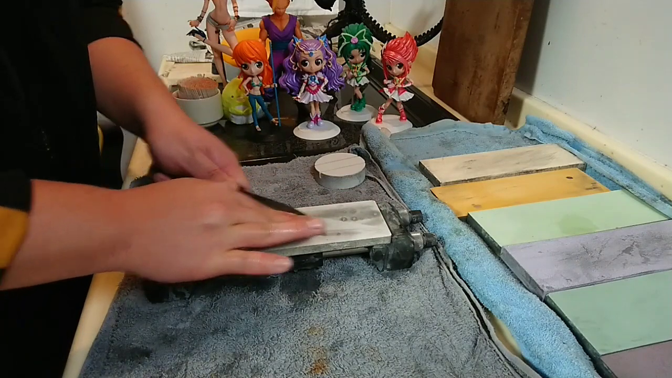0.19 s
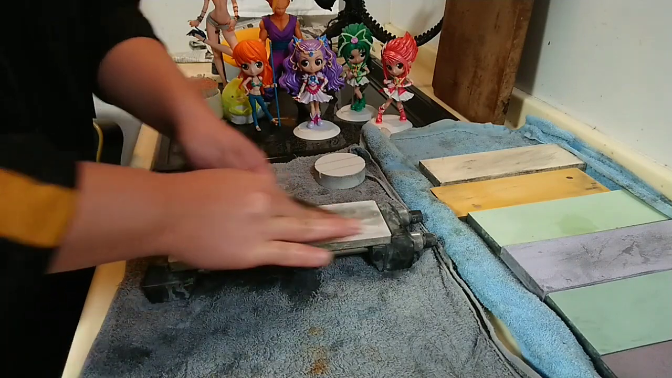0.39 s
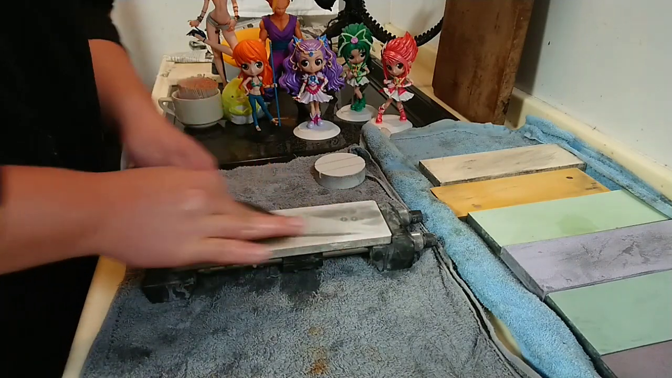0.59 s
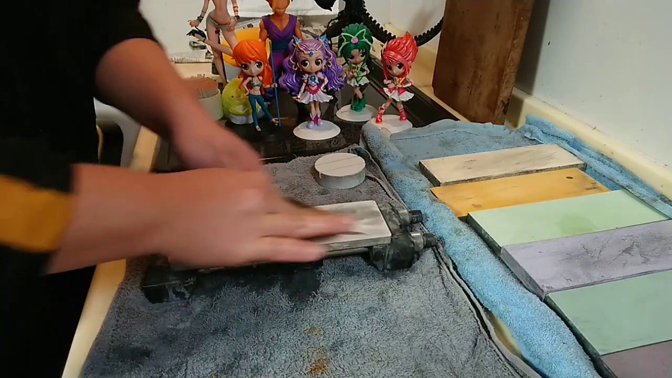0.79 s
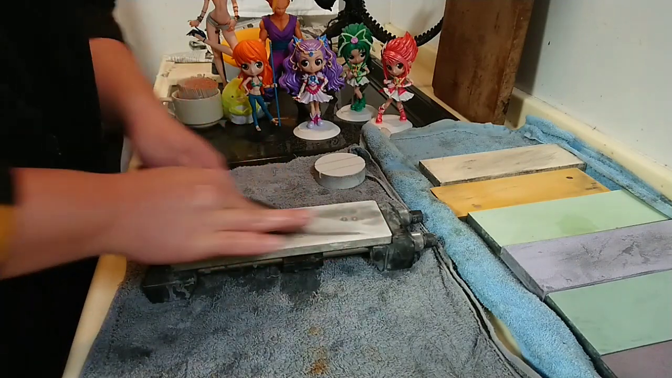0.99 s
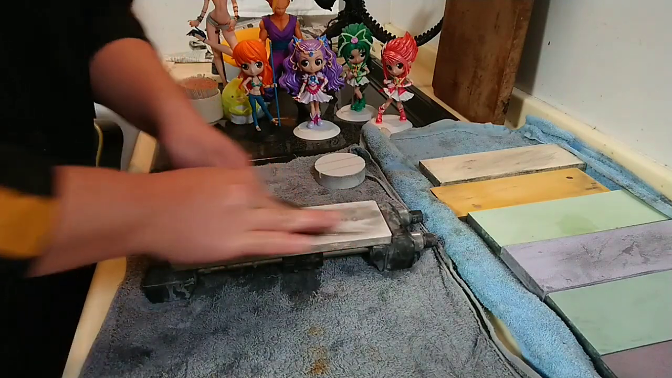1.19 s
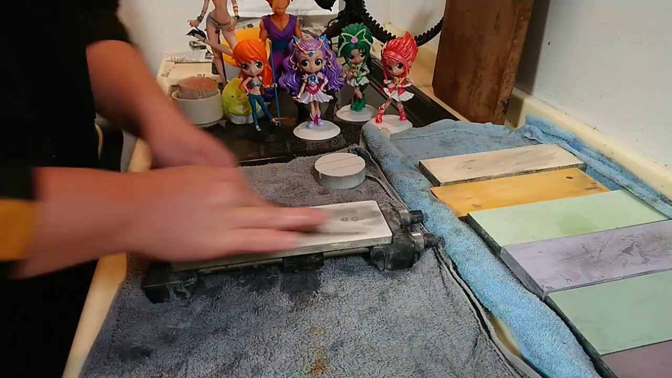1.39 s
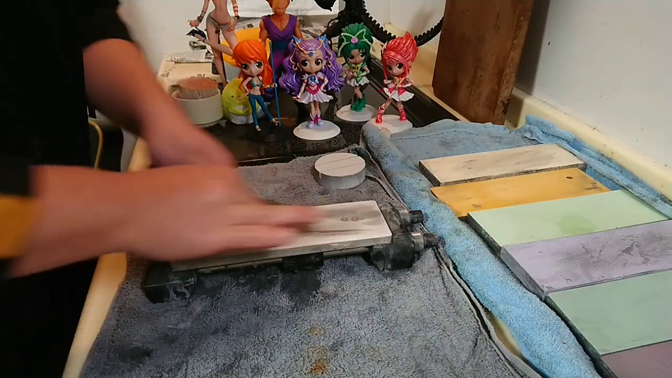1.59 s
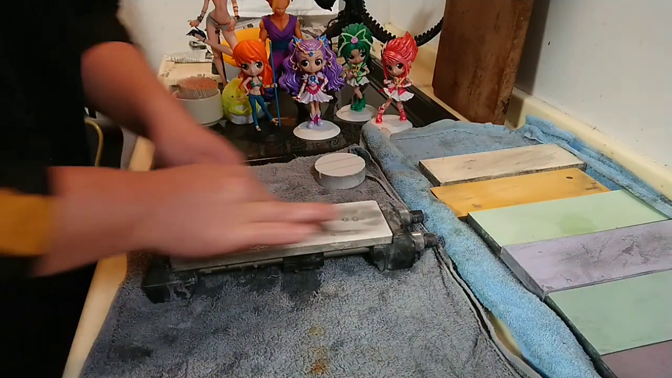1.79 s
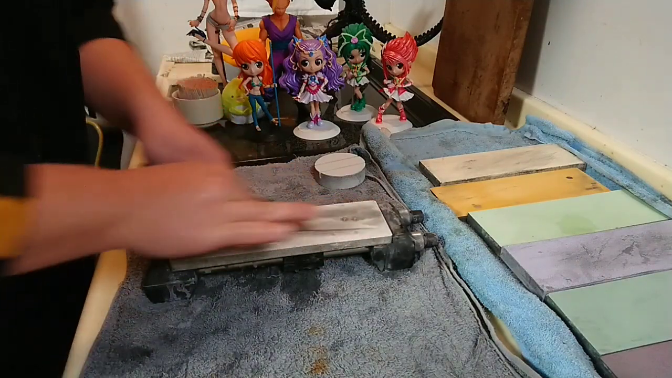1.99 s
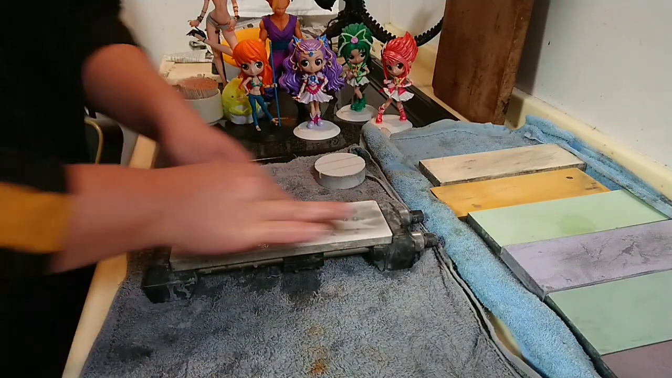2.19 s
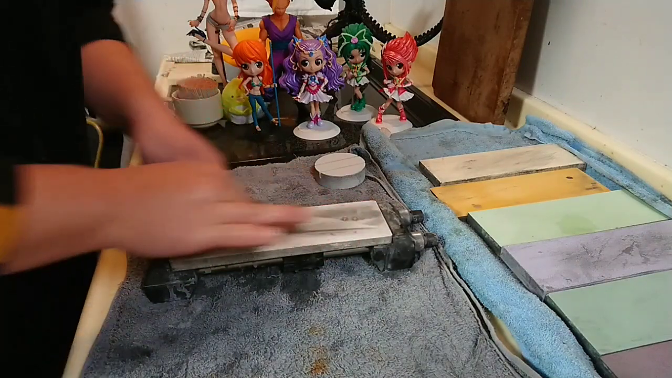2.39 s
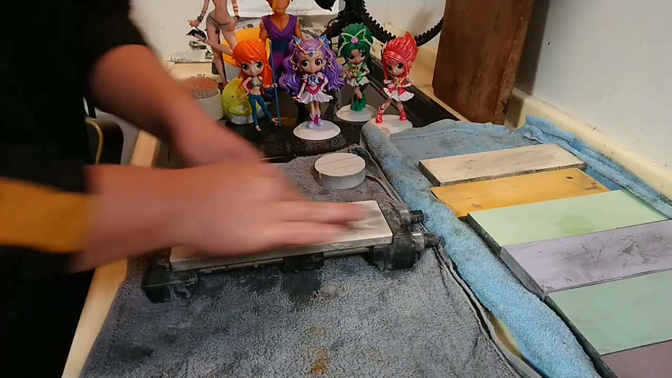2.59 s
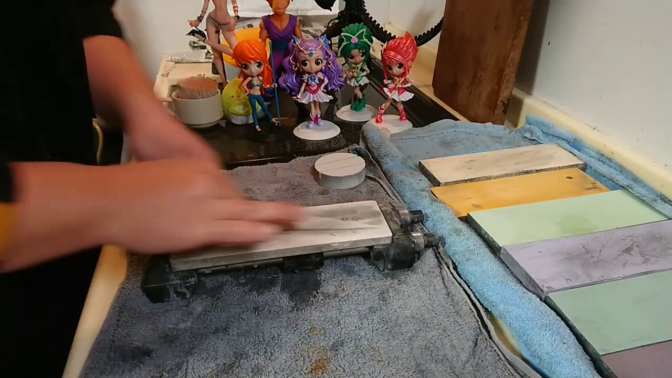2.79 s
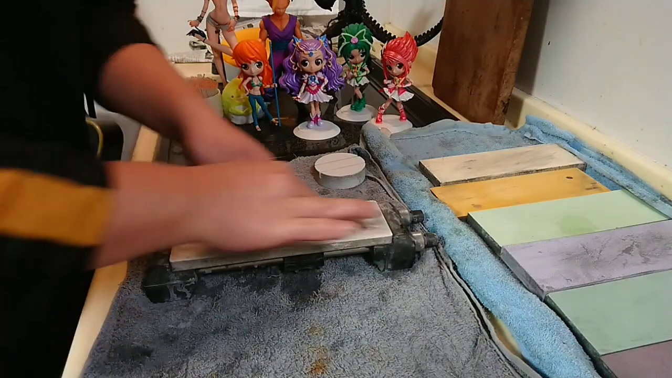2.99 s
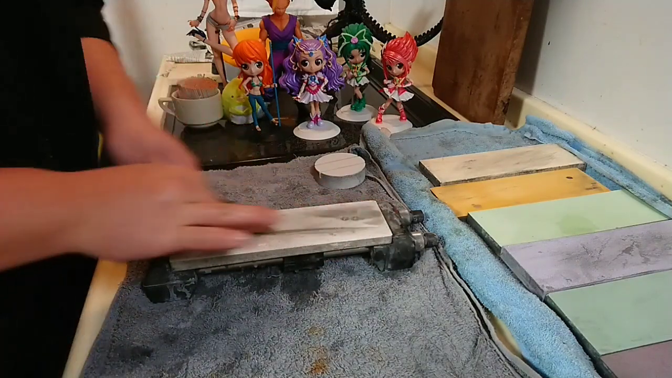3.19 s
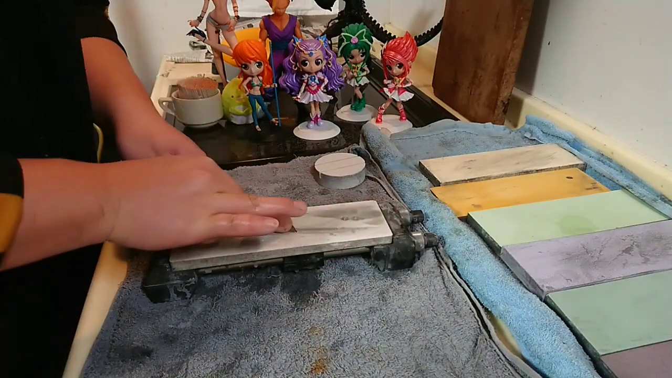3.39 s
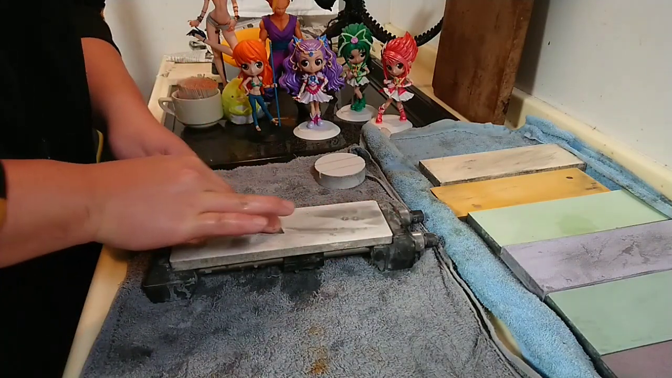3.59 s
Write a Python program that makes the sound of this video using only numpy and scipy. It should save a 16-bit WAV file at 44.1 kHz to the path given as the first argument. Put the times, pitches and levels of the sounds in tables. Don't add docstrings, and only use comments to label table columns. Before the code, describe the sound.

Knife blade scraping fast back and forth on a wet whetstone, gritty and hissing, close up

```python
import sys
import numpy as np
from scipy import signal
from scipy.fft import rfft, irfft, next_fast_len
from scipy.io import wavfile
from scipy.ndimage import uniform_filter1d

SR = 44100
rng = np.random.default_rng(int(sys.argv[2]) if len(sys.argv) > 2 else 0)


def master(y):
    cut = np.clip(np.atleast_2d(y).T, -1, 1)
    pcm = np.round(cut * 32767)
    wavfile.write(sys.argv[1], SR, pcm.astype(np.int16))


def natural_amplitude(level_db):
    exponent = np.asarray(level_db, float) / 20
    return 10 ** exponent


N = 160965

# f/Hz, level/dB
ROOM_HUSH = [(30, 4.5), (120, -4), (230, -21), (600, -19), (1400, -23), (2500, -32), (5000, -42),
             (16000, -48)]
# turn t/s, scrape level/dB, lean/dB (late minus early), table shake level/dB
STROKES = [(0.172, -26.5, -5, -50.5), (0.375, -25.5, -1.5, -45.5), (0.574, -23, -3.5, -45),
           (0.765, -28, -5, -44), (0.963, -24.5, 5.5, -45.5), (1.147, -26.5, -6.5, -45.5),
           (1.34, -24.5, 3.5, -44.5), (1.527, -27, -4.5, -44.5), (1.725, -23.5, 2, -44.5),
           (1.924, -27, -7, -42.5), (2.115, -24.5, 0, -43.5), (2.311, -26, 0.5, -46.5),
           (2.504, -23, -2.5, -45), (2.701, -27.5, -10, -43.5), (2.896, -24, 3.5, -45.5),
           (3.083, -25, -2, -45), (3.286, -31.5, -11, -49.5), (3.438, -41, -2, -52.5),
           (3.605, -29.5, 15, -51), (3.8, -26, 0, -60)]
# t/s, level/dB
COARSE_GRAINS = [
    (0.133, -68),
    (0.782, -33),
    (1.743, -34),
    (2.907, -39),
    (3.482, -39),
    (3.502, -37.5),
    (3.52, -49),
    (3.526, -42.5),
    (3.618, -51),
]
# f/Hz, width/Hz, level/dB, gain at the far end of the stone/dB, gain on the pull/dB
BLADE_MODES = [(741, 150, 11, 0, 0.5), (1461, 190, 5.5, -10.5, 4), (1640, 340, 1.5, -8.5, -4.5),
               (2170, 120, -9, -24.5, -4), (2720, 155, 4.5, 6, 0), (3220, 210, 6, -3.5, 1),
               (3790, 410, 6, 2, 3.5), (4580, 290, 3.5, -12, 4), (5080, 390, 6, 5.5, -2.5),
               (5700, 480, 5, 1.5, -1), (6020, 210, -2, -21, -2), (7056, 494, 7, -5, 0.5),
               (8870, 820, 3, -5, -0.5), (10330, 1730, -0.5, -8, 1)]
# f/Hz, level/dB
LEFT_PORT = [(300, -26.5), (560, -27), (1300, -11.5), (2400, -10), (4300, -2), (7500, -3.5), (12500, -3.5),
             (16000, -5.5)]
RIGHT_PORT = [(300, -35.5), (560, -35.5), (1300, -12), (3200, -7.5), (5200, -13.5), (6800, 1.5), (8000, -7),
              (16000, -5.5)]
# f/Hz, share in common/0-1, lead of the left/rad
PORT_PAIR = [(520, 0, 0.12), (1610, 0.65, 2.24), (2280, 0.02, 3.4), (6050, 0, 1.33), (6500, 0.3, .1),
             (9400, 1, .01), (10100, 0.67, .01), (16000, .4, .01)]
# f/Hz, width/Hz, level/dB
TABLE_MODES = [(48.6, 13.6, 2), (71.2, 10.4, -2), (108.5, 19, -4.5), (196.4, 28.5, -9), (284.3, 71, -17.5),
               (421.4, 69, -23)]

HUSH_DB, HUSH_RIGHT_DB = -66, -7
WHINE_HZ, WHINE_DB, FIZZ_HZ, FIZZ_WIDTH_HZ, FIZZ_DB = 6700, -92, 10200, 1300, -82
TOUCH_S, UP_TO_SPEED_S, START_DB_PER_S, RESTING_DB = 0.132, 0.22, 493, -32
SPEED_LAW, CREEP, FLAT, FAR_CREEP = 1.41, 0.065, 1.67, 4.4
TICKS_PER_S, TICK_SPREAD_DB, HISS_SHARE, CHATTER_DB, CHATTER_S = 7000, 3, 0.5, 0.22, 0.0068
DRIFT, BEND, PLAIN_DB, FLARE_DB = 0.012, 0.012, -1, 4
LOW_HZ, LOW_PULL_DB = 772, 9
SHADE_HZ, SHADE_WIDTH_HZ, SHADE_DB = 2090, 540, -4.5
SLOW_DULL_DB = -1
ROOM_S, ROOM_DB = 0.38, -9
FRAME, HOP = 512, 128
STILL_DB, MOVING_DB, COMB_S = 3, 2.5, 0.09
PATCH_DB, PATCH_HZ, PATCH_S = 1.5, 613, 0.051
HUMP_HZ, HUMP_WIDTH_HZ, HUMP_DB = 5380, 380, 5.5
NOTCH_HZ, NOTCH_WIDTH_HZ, NOTCH_DB = 5960, 300, -22
SHAKE_RISE_S, SHAKE_FALL_S, SHAKE_REST_DB = 0.031, 0.11, -8
SHAKE_RIGHT_DB, SHAKE_OWN, SHAKE_TILT_DB = -10, 0.68, 3.5
MASK_DB, MASKED_DB, EDGE_HZ = -21, -40, 15950


def evened(x):
    return x / np.sqrt(np.mean(x ** 2) + 1e-20)


def read(hz, value, at):
    return np.interp(np.log(at + 1), np.log(np.asarray(hz) + 1), value)


def colour(x, gain):
    size = next_fast_len(N + 4096)
    return irfft(rfft(x, size) * gain(np.fft.rfftfreq(size, 1 / SR)), size)[..., :N]


def resonate(hz, centre, width):
    return 1 / (1 + ((hz - centre) / width) ** 2)


def wander(seconds, count, step=1):
    span = max(int(seconds * SR / step), 2)
    noise = rng.standard_normal((N // step + 9, count)).T
    return evened(uniform_filter1d(uniform_filter1d(noise, span), span))


def hush():
    noise = rng.standard_normal((4, N))
    air = evened(colour(noise[:2], lambda f: natural_amplitude(read(*np.transpose(ROOM_HUSH), f)) * (f > 20)))
    whine = natural_amplitude(WHINE_DB) * evened(colour(noise[2], lambda f: resonate(f, WHINE_HZ, 25)))
    fizz = natural_amplitude(FIZZ_DB) * evened(colour(noise[3], lambda f: resonate(f, FIZZ_HZ, FIZZ_WIDTH_HZ) ** 2))
    return natural_amplitude(HUSH_DB) * air * natural_amplitude(np.array([[0], [HUSH_RIGHT_DB]])) + np.array([fizz, whine])


def motion():
    t, turns = np.arange(N) / SR, np.array(STROKES)[:, 0]
    k = np.clip(np.searchsorted(turns, t) - 1, 0, len(turns) - 2)
    way = np.clip((t - turns[k]) / np.diff(turns)[k], 0, 1)
    start = (t > TOUCH_S) * natural_amplitude(np.clip(START_DB_PER_S * (t - UP_TO_SPEED_S), RESTING_DB, 0))
    return k, way, start


def grit():
    k, way, start = motion()
    strokes = np.array(STROKES)
    speed = np.tanh(FLAT * np.sin(np.pi * way)) / np.tanh(FLAT)
    speed = np.where((k == 0) & (way < 0.5), 1, speed)
    at_far_half = (k % 2 == 1) == (way < 0.5)
    speed = np.hypot(speed, CREEP * np.where(at_far_half, FAR_CREEP, 1))
    pressure = uniform_filter1d(natural_amplitude(strokes[k, 1] + strokes[k, 2] * (way - 0.5)), size=900)
    level = pressure * speed ** SPEED_LAW * start

    sizes = natural_amplitude(TICK_SPREAD_DB * np.minimum(rng.exponential(1, N), 5))
    ticks = evened(sizes * (rng.random(N) < TICKS_PER_S / SR))
    out = np.sqrt(1 - HISS_SHARE) * ticks * rng.choice([-1., 1.], (2, N))
    out = out + np.sqrt(HISS_SHARE) * rng.standard_normal((2, N))
    out = out * level * natural_amplitude(CHATTER_DB * wander(CHATTER_S, count=1)[:, :N])
    for s, db in COARSE_GRAINS:
        out[:, round(s * SR):][:, :4] += 5 * natural_amplitude(db) * np.array([0.8, 0.8, -0.4, -1])
    return out


def blade(hz, frames):
    at = np.minimum(np.arange(frames) * HOP, N - 1)
    k, way, start = [v[at] for v in motion()]
    pull = uniform_filter1d((k % 2) - 0.5, size=7)
    far = -0.5 * np.cos(np.pi * way) * np.where(k % 2, -1, 1)
    slow = np.maximum(1 - np.sin(np.pi * way), 1 - np.sqrt(start))
    drift = wander(0.015, count=len(BLADE_MODES), step=HOP)
    flare = wander(0.03, count=2 * len(BLADE_MODES), step=HOP)
    f = hz[:, None]
    power = natural_amplitude(2 * PLAIN_DB) * np.ones((2, len(hz), frames))
    for i, (centre, width, db, far_db, pull_db) in enumerate(BLADE_MODES):
        off = (f - centre * (1 + DRIFT * drift[i, :frames] + BEND * far)) / (0.5 * width)
        flare_db = FLARE_DB * flare[2 * i:2 * i + 2, None, :frames]
        power += natural_amplitude(2 * (db + far_db * far + pull_db * pull + flare_db)) / (1 + off ** 2)
    rasp = LOW_PULL_DB * pull / (1 + (f / LOW_HZ) ** 4)
    shade = SHADE_DB * (far + 0.5) ** 4 * np.exp(-((f - SHADE_HZ) / SHADE_WIDTH_HZ) ** 2)
    return np.sqrt(power) * natural_amplitude(rasp + shade + SLOW_DULL_DB * slow * f / 10000)


def causal(gain):
    c = irfft(np.log(gain + 1e-5), axis=0)
    c[1:FRAME // 2] *= 2
    c[FRAME // 2 + 1:] = 0
    return np.exp(rfft(c, axis=0))


def scrape():
    hz, t, (a, b) = signal.stft(grit(), SR, nperseg=FRAME, noverlap=FRAME - HOP)
    at, share, lead = np.transpose(PORT_PAIR)
    same = np.clip(read(at, share, hz), 0, 1)[:, None]
    turned = np.exp(-1j * read(at, lead, hz))[:, None] * a
    z = np.array([a, same * turned + np.sqrt(1 - same ** 2) * b])
    port = natural_amplitude(np.array([read(*np.transpose(LEFT_PORT), hz), read(*np.transpose(RIGHT_PORT), hz)]))
    gain = blade(hz, len(t)) * port[:, :, None]
    z = z * np.array([causal(gain[0]), causal(gain[1])])
    keep = natural_amplitude(-120 * HOP / SR / ROOM_S)
    ringing = signal.lfilter([0, 0, 1 - keep], [1, -keep], uniform_filter1d(abs(z) ** 2, size=3, axis=1))
    noise = rng.standard_normal((len(t), len(hz), 2, 2)).T
    z = z + natural_amplitude(ROOM_DB) * np.sqrt(2 * abs(ringing)) * (noise[0] + 1j * noise[1])
    return signal.istft(z, SR, nperseg=FRAME, noverlap=FRAME - HOP)[1][:, :N]


def nearby(x):
    hz, t, z = signal.stft(x, SR, nperseg=2048, noverlap=1536)
    still = evened(uniform_filter1d(rng.standard_normal((len(hz), 2)).T, size=2))[:, :, None]
    moving = uniform_filter1d(rng.standard_normal((len(t), len(hz), 2)).T, size=2, axis=1)
    moving = evened(uniform_filter1d(moving, max(int(COMB_S * SR / 512), 2), axis=2))
    patch = rng.standard_normal((len(t), len(hz))).T
    patch = uniform_filter1d(patch, max(int(PATCH_HZ * 2048 / SR), 2), axis=0)
    patch = evened(uniform_filter1d(patch, max(int(PATCH_S * SR / 512), 2), axis=1))
    patch = patch * (hz > LOW_HZ)[:, None]
    hump = HUMP_DB * np.exp(-((hz - HUMP_HZ) / HUMP_WIDTH_HZ) ** 2)
    notch = NOTCH_DB * np.exp(-((hz - NOTCH_HZ) / NOTCH_WIDTH_HZ) ** 4)
    hump_and_notch = np.array([hump, notch])[:, :, None]
    z = z * natural_amplitude(STILL_DB * still + MOVING_DB * moving + PATCH_DB * patch + hump_and_notch)
    return signal.istft(z, SR, nperseg=2048, noverlap=1536)[1][:, :N]


def table_gain(f):
    power = sum(natural_amplitude(2 * db) * resonate(f, hz, w) ** 2 / w for hz, w, db in TABLE_MODES)
    return np.sqrt(power) / (1 + (40 / (f + 1)) ** 4)


def shake():
    t = np.arange(0, N + 64, 64) / SR
    force = np.zeros(len(t))
    for s, _, _, db in STROKES:
        u = np.maximum(t - s + SHAKE_RISE_S, 0)
        jolt = (1 - np.exp(-u / SHAKE_RISE_S)) * np.exp(-u / SHAKE_FALL_S) * 2
        force += natural_amplitude(db) * (jolt + natural_amplitude(SHAKE_REST_DB) * (u > 0) * (u < 0.2))
    force = np.interp(np.arange(N) / SR, t, uniform_filter1d(force, size=9))
    noise = rng.standard_normal((2, N))
    left = colour(noise[0], table_gain)
    right = colour(noise[0] + SHAKE_OWN * noise[1],
                   lambda f: table_gain(f) * natural_amplitude(SHAKE_TILT_DB * np.log2(f / 60 + 0.5)))
    return force * np.array([evened(left), natural_amplitude(SHAKE_RIGHT_DB) * evened(right)])


def scene():
    touched = np.arange(N) / SR > TOUCH_S - 0.001
    return hush() + nearby(scrape()) * touched + shake()


def roll_off(x):
    return signal.sosfilt(signal.butter(12, 16290, fs=SR, output="sos"), x)


def record(dry):
    hz, t, z = signal.stft(dry, SR, nperseg=2048)
    edges = np.r_[0:40:4, 40:96:8, 96:144:12, 144, 160, 176, 196, 216, 240, 264, 292, 320:768:32]
    wide = np.diff(np.r_[edges, len(hz)])
    band = np.add.reduceat(abs(z) ** 2, edges, axis=1) / wide[:, None]
    treble = (abs(z[:, 100:700]) ** 2).mean((0, 1))
    gain = np.where(band < natural_amplitude(2 * MASK_DB) * treble, natural_amplitude(MASKED_DB), 1)
    gain = np.repeat(gain, wide, axis=1) * (hz < EDGE_HZ)[:, None]
    mix = signal.istft(z * gain, SR, nperseg=2048)[1][:, :N]
    return roll_off(mix)


dry = scene()
out = record(dry)
master(out)
```